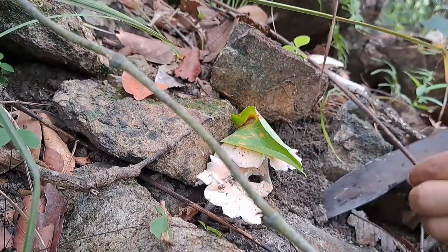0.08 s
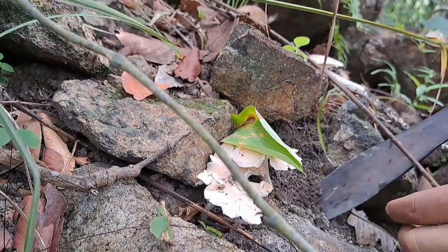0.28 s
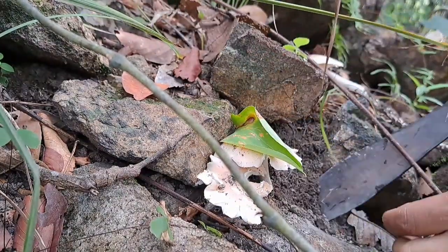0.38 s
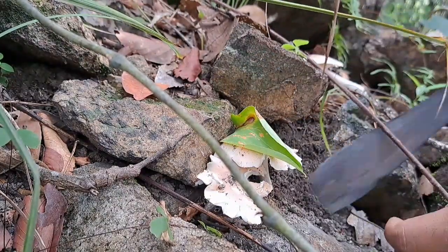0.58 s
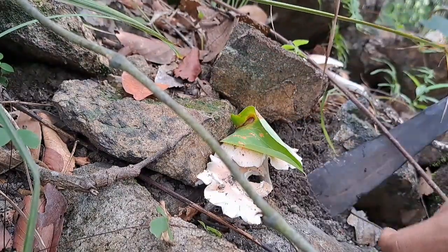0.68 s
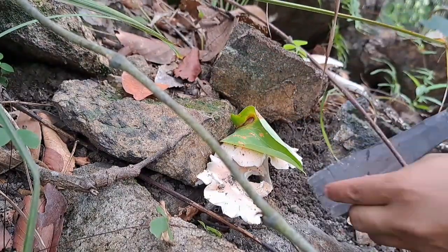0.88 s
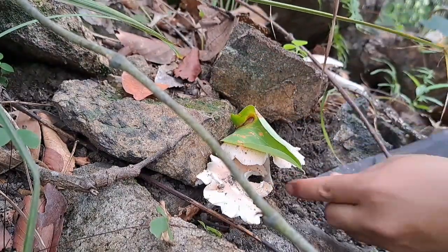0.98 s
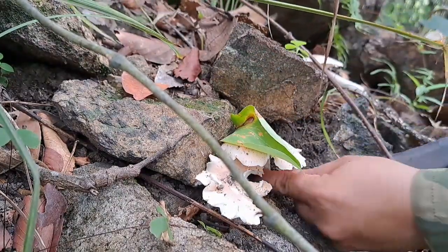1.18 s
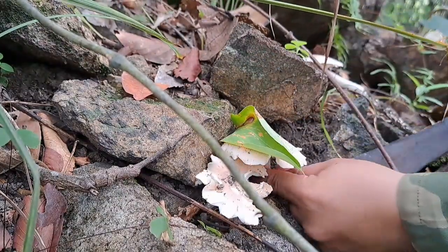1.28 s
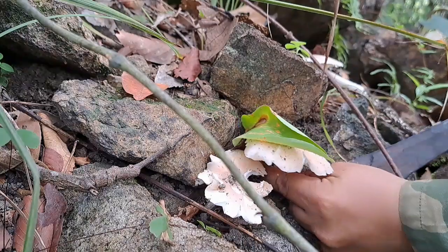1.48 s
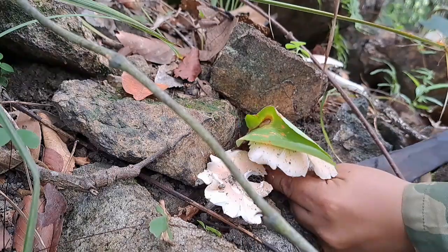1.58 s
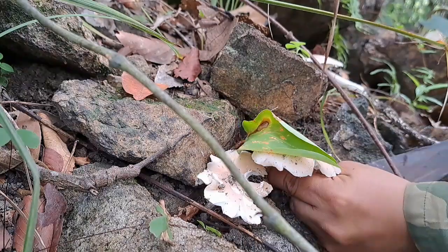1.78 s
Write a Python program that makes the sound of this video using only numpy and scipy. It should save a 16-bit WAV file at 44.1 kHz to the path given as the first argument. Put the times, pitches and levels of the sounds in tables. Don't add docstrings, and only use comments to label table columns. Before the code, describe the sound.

A broad knife scrapes and chops gritty, stony soil, then a hand rustles leaves and snaps stalks

```python
import sys
import numpy as np
from scipy import signal
from scipy.fft import rfft, irfft, next_fast_len
from scipy.io import wavfile
from scipy.ndimage import uniform_filter1d

SR = 44100
rng = np.random.default_rng(int(sys.argv[2]) if len(sys.argv) > 2 else 0)


def unload_wav(signal):
    wavfile.write(
        sys.argv[1],
        SR,
        np.round(np.clip(np.atleast_2d(signal).T, -1, 1) * 32767).astype(np.int16),
    )


def voltage_ratio(decibels):
    exponent = np.asarray(decibels, float) / 20
    return 10 ** exponent


N = 81585
T = np.arange(N) / SR
M = next_fast_len(N + 8192)
F = np.arange(M // 2 + 1) * SR / M + 1
THIN = 1 / (1 + (350 / F) ** 4)


def unit(x):
    return x / np.sqrt(np.mean(x ** 2))


def on_log(table, col=1):
    a = np.array(table, float)
    return np.interp(np.log(F), np.log(a[:, 0]), a[:, col])


def shape(x, gain):
    return irfft(rfft(x, M) * gain, M)[..., :N]


def colour(table):
    g = voltage_ratio(on_log(table))
    return g / np.sqrt(np.mean(g ** 2))


def resonance(hz, width_hz):
    return 1j * F * width_hz / (hz ** 2 - F ** 2 + 1j * F * width_hz)


def tail(t60):
    n = np.arange(4096)
    h = rng.standard_normal(4096) * voltage_ratio(-60 * n / SR / t60)
    return rfft(h / np.sqrt(np.sum(h ** 2)), M)


def twin(x):
    return np.array([x, x * rng.choice([-1., 1.], N)])


def wander(hold):
    return np.repeat(rng.standard_normal(N // hold + 1), hold)


def crush(coarse_db):
    strength = voltage_ratio(coarse_db * wander(20)[:N])
    return unit(twin(strength * rng.standard_normal(N)))


def grains(per_s, spread_db, flicker_hz, flicker_db):
    k = int(SR / flicker_hz)
    flicker = voltage_ratio(flicker_db * uniform_filter1d(wander(k), k)[:N])
    out = 0
    for hz in 700. * 2 ** (np.arange(16) / 3.3):
        patch = voltage_ratio(2.1 * uniform_filter1d(wander(900), 600)[:N])
        hit = rng.random(N) < per_s / SR
        size = voltage_ratio(np.minimum(rng.exponential(size=N), 5) * spread_db) * rng.standard_normal(N)
        clicks = twin(hit * size * patch * flicker)
        out = out + shape(clicks, np.sqrt(hz) * resonance(hz, 0.27 * hz) ** 2)
    return unit(out)


def effort(tables):
    s, level_db, thud_db = np.vstack(tables).T
    return voltage_ratio(np.interp(T, s, level_db, -150, -150)), voltage_ratio(np.interp(T, s, thud_db))


def burst(s, db, t60, attack):
    t = T - s
    swell = np.clip(t / max(attack, .0003) + .5, 0, 1) ** 2
    return swell * voltage_ratio(db - 60 * np.clip(t - attack / 2, 0, 1) / np.clip(t60, .004, .034))


# pitch_hz [Hz], width_hz [Hz], level_db [dB]
SOIL = [(60.6, 15.5, 0.5), (135.8, 18, 3), (233.6, 56, 1), (314, 81, 3.5), (685, 1360, -4)]


def soil(x, cut_hz):
    g = 0
    for k, (hz, width_hz, db) in enumerate(SOIL):
        g = g + (-1) ** k * voltage_ratio(db) * resonance(hz, width_hz)
    g = g / np.sqrt(np.mean(abs(g) ** 2))
    return shape(x, g / (1 + (cut_hz / F) ** 2))


# pitch_hz [Hz], level_db [dB]
FOREST = [(24, -32), (40, 14), (1290, -12.5), (1660, -3.5), (4640, -3), (15800, -8)]
FOREST_DB = -58


def forest():
    mid, side = (shape(rng.standard_normal(N), colour(FOREST)) for _ in range(2))
    side = shape(side, np.clip(F / 1200, .25, 1))
    return voltage_ratio(FOREST_DB - 9) * np.array([mid + side, mid - side])


# start_s [s], peak_db [dB], pitch_hz [Hz], t60_s [s]
THUDS = [
    (0.304, -8.5, 430, 0.0089),
    (0.324, -23.5, 460, 0.026),
    (0.6252, -17, 520, 0.0087),
    (0.639, -16, 347, 0.01),
    (0.678, -31, 140.5, 0.07),
    (0.701, -41, 65.3, 0.09),
    (1.4033, -32.5, 155, 0.068),
    (1.417, -40.5, 115, 0.08),
    (1.44, -48, 180, 0.083),
]
THUD_ROUGH = 0.22


def thuds():
    rumble = unit(shape(rng.standard_normal(N), resonance(190, 210) ** 2))
    out = 0
    for s, db, hz, t60 in THUDS:
        t = T - s
        fall = voltage_ratio(db - 60 * np.clip(t, 0, 1) / np.clip(t60, .005, .1))
        rise = np.clip(t * hz * 2, 0, 1)
        rough = THUD_ROUGH * (130 / hz) ** 2 * rumble
        out = out + fall * rise * (np.sin(2 * np.pi * hz * t) + rough)
    return out


# start_s [s], length_s [s], pitch_hz [Hz], level_db [dB]
RUBS = [(1.511, 0.033, 4000, -49), (1.506, 0.11, 4530, -46.5), (1.53, .012, 3000, -43),
        (1.555, .028, 440, -51), (1.556, 0.019, 1650, -44.5), (1.633, 0.023, 4350, -45),
        (1.635, .055, 6180, -60), (1.651, 0.027, 3530, -61), (1.684, 0.032, 2820, -59),
        (1.725, 0.04, 2890, -61), (1.7, 0.16, 4300, -64.5), (1.825, 0.019, 7160, -55.5),
        (1.826, 0.013, 8600, -59)]
RUB_WIDTH, RUB_FADE_S = 0.017, 0.0032


def rubs():
    noise, out = crush(1.2), 0
    for s, length, hz, db in RUBS:
        width = max(RUB_WIDTH * hz, 60)
        env = np.clip(np.minimum(T - s, s + length - T) / RUB_FADE_S + .5, 0, 1)
        mode = resonance(hz, width) * np.sqrt(SR / np.pi / width)
        out = out + shape(voltage_ratio(db) * env * noise, mode)
    return out


# start_s [s], rustle level_db [dB], soil thud_db [dB re rustle]
MOVES = [
    [(.745, -47, -10), (.76, -38.5, -12), (.86, -37, -4), (.87, -48, -16.5), (.92, -54.5, 2.5)],
    [(.95, -39.5, -17), (.96, -37, -5.5), (1.04, -40.5, -3.5), (1.13, -44, -4.5), (1.165, -52, -6),
     (1.19, -64, 2)],
    [(1.22, -39, -12), (1.3, -46, -11.5), (1.35, -68, -14), (1.4, -34.5, -23.5), (1.415, -56, -4),
     (1.48, -63, -36)],
    [(1.512, -52.5, -19), (1.54, -36.5, -21), (1.603, -37, -16.5), (1.628, -53.5, -7),
     (1.652, -43.5, -16.5), (1.7, -57.5, -7.5), (1.85, -58, -14)],
]
# start_s [s], peak_db [dB], pitch_hz [Hz], burst t60_s [s], attack_s [s]
SNAPS = [(0.73, -18.5, 8000, 0.016, 0.0013), (0.757, -32.5, 4000, 0.025, 0.001),
         (0.771, -27, 5370, 0.023, 0.0017), (0.804, -27, 1600, 0.026, 0.004),
         (0.8798, -26, 5200, 0.014, 0.00045), (0.9543, -26.5, 1830, 0.024, 0.0023),
         (0.9698, -25, 1930, 0.037, 0.0012), (0.9884, -21, 2070, 0.04, 0.0033),
         (1.0077, -7, 8670, 0.022, 0.0013), (1.034, -23.5, 2030, 0.012, 0.002),
         (1.059, -28, 3550, 0.019, 0.0034), (1.084, -31, 5000, 0.013, 0.0023),
         (1.11, -29, 5150, 0.01, 0.0012), (1.2242, -29.5, 5500, 0.023, 0.0035),
         (1.237, -36, 5200, 0.014, 0.002), (1.4046, -18, 7460, 0.018, 0.0035),
         (1.5345, -22.5, 7900, 0.033, 0.003), (1.5389, -18.5, 2980, 0.019, 0.0011),
         (1.5613, -17.5, 4540, 0.017, 0.008), (1.5866, -25.5, 4560, 0.017, 0.003),
         (1.598, -20, 4600, 0.016, 0.00074), (1.613, -33, 4000, 0.015, 0.001),
         (1.621, -35, 4500, 0.012, 0.001), (1.6349, -25.5, 4370, 0.01, 0.0013),
         (1.7231, -37, 5500, 0.02, 0.0019)]
# pitch_hz [Hz], level_db [dB per Hz]
LEAF = [(350, -7.5), (600, -8.5), (2980, 0.5), (3320, -3), (4550, 3.5), (6950, -4.5), (15800, -10.5)]
RUSTLE_PER_S, RUSTLE_SPREAD_DB = 1400, 1


def hand():
    gain, thud = effort(MOVES)
    rustle = gain * grains(RUSTLE_PER_S, RUSTLE_SPREAD_DB, flicker_hz=89.92, flicker_db=3)
    low = thud * twin(twin(rustle[0])[1])
    noise, top = crush(1.13), rustle
    for s, db, hz, t60, attack in SNAPS:
        snap = noise * burst(s, db, t60, attack)
        top = top + shape(snap, 0.44 + 1.04 * resonance(hz, 0.12 * hz))
    return shape(top, colour(LEAF) * THIN) + soil(low, cut_hz=27)


# pitch_hz [Hz], level_db [dB], t60_s [s]
BLADE = [(1033, -5.5, .05), (1631, -17, .03), (2055, -15, .03), (2896, -3, .055), (3854, -12, .07),
         (4280, -6, .025), (4500, -9, .03), (4975, 0, .022), (5370, -6, .03), (6165, -12, .03),
         (7250, -13, .04), (9740, -14, .05), (11540, -11, .03), (13400, -11, .28)]


def blade_modes():
    modes = 0
    for hz, db, t60 in BLADE:
        decay = np.log(1000) / t60
        modes = modes + voltage_ratio(db) * resonance(hz, decay / np.pi) / np.sqrt(decay / SR)
    return modes


# start_s [s], end_s [s]
BURIED = [
    (.115, .2),
    (.358, .4),
    (.49, .52),
    (.686, 2),
]
BURIED_T60_S = .04


def soil_grip():
    return voltage_ratio(sum(-60 * np.clip(T - a, 0, 1) / BURIED_T60_S * (T < b) for a, b in BURIED))


# start_s [s], grit level_db [dB], soil thud_db [dB re grit]
STROKES = [
    [(0, -42.5, -27), (.01, -33.5, -9), (.06, -41.5, 2), (.105, -40, 5), (.12, -65, -4), (.18, -48.5, -13)],
    [(.215, -34.5, -10), (.25, -34.5, -9.5), (.297, -46, 2.5), (.304, -29, 7.5), (.35, -28, -3),
     (.37, -33, -6.5), (.39, -45.5, -1)],
    [(.47, -40, -2.5), (.515, -44, -18.5), (.55, -39, -13), (.605, -36.5, -25.5)],
    [(.625, -23, 0.5), (.652, -19, -13.5), (.658, -25, -10.5), (.687, -25.5, -4), (.693, -40.5, -27),
     (.72, -36.5, -4)],
]
# start_s [s], peak_db [dB], ring_db [dB], burst t60_s [s], attack_s [s]
STRIKES = [(0.0371, -22.5, -10, 0.031, 0.0058), (0.081, -23, -8, 0.066, 0.0029),
           (0.1031, -21.5, -25, 0.011, 0.001), (0.164, -47, -6, 0.02, 0.0018),
           (0.1866, -40, -17, 0.02, 0.001), (0.205, -38, -6, 0.03, 0.002),
           (0.2225, -17, -12.5, 0.039, 0.0017), (0.2613, -26.5, -1, 0.04, 0.0027),
           (0.3018, -10.5, -29, 0.04, 0.001), (0.309, -20, -16, 0.026, 0.0025),
           (0.3135, -9, -13.5, 0.044, 0.0033), (0.3332, -17, -31, 0.03, 0.0028),
           (0.341, -11, -21, 0.017, 0.001), (0.346, -24, -27, 0.024, 0.002),
           (0.4015, -29.5, -15, 0.013, 0.0006), (0.417, -34, -21, 0.024, 0.0025),
           (0.4916, -44, -18, 0.018, 0.002), (0.4447, -20, -10.5, 0.021, 0.0011),
           (0.4563, -25.5, -29, 0.0073, 0.00058), (0.521, -17, -10.5, 0.041, 0.0035),
           (0.527, -24.5, -6, 0.039, 0.00066), (0.5332, -20.5, -9, 0.039, 0.001),
           (0.5513, -19.5, -7.5, 0.041, 0.0018), (0.5569, -11, -2.5, 0.03, 0.00074),
           (0.561, -13, -6, 0.014, 0.00094), (0.6072, -29, -17, 0.033, 0.001),
           (0.613, -24, -15, 0.033, 0.002), (0.6242, -10.5, -7.5, 0.022, 0.0065),
           (0.63, -10, -27.5, 0.011, 0.00045), (0.6365, -11.5, -32, 0.034, 0.0057),
           (0.641, -17.5, -3.5, 0.0083, 0.0016), (0.647, -16.5, -22, 0.026, 0.002),
           (0.65, -27, -18, 0.01, 0.0009), (0.667, -22, -15, 0.027, 0.0041),
           (0.676, -34, -14, 0.018, 0.0037), (0.685, -41, -18, 0.016, 0.0024),
           (0.7004, -38, -12, 0.014, 0.0023)]
# pitch_hz [Hz], level_db [dB per Hz]
STONE = [(350, -66), (600, -9), (1310, -18.5), (1700, 4.5), (2140, -8), (4420, -0.5), (15800, -17)]
GRIT_PER_S, GRIT_SPREAD_DB, SCRAPE_RING_DB = 1200, 2.5, -15


def knife():
    gain, thud = effort(STROKES)
    grit = gain * grains(GRIT_PER_S, GRIT_SPREAD_DB, flicker_hz=159.9, flicker_db=3)
    noise = crush(2.1)
    hit_env = chatter_env = blows = 0
    for s, db, ring_db, t60, attack in STRIKES:
        hit_env = hit_env + burst(s, db, t60, attack) / (1 + 3 * voltage_ratio(ring_db))
        chatter_env = chatter_env + burst(s, db + ring_db - 3.5, t60, attack)
        blow_at = int((s + .001) * SR)
        blows = blows + voltage_ratio(db + 2 * ring_db + 21) * (np.arange(N) == blow_at)
    modes = blade_modes()
    light = modes / (1 + (1600 / F) ** 4)
    scrape = shape(voltage_ratio(SCRAPE_RING_DB) * grit + noise * chatter_env, light)
    ring = soil_grip() * (scrape + shape(blows, modes))
    stone = shape(grit + noise * hit_env, colour(STONE) * THIN)
    low = thud * twin(twin(grit[0])[1])
    return stone + ring + soil(low, cut_hz=87)


# pitch_hz [Hz], level_db [dB re right], likeness [0-1]
LEFT = [(97, 0.5, 0.99), (400, -3, 0.68), (1420, -4.5, 1), (2540, -6, 0), (5000, -10.5, 0.37),
        (6300, -8.5, 0), (7600, -6.5, 0.14), (15300, -3, 0.17)]
ECHO_DB, ECHO_T60_S = -14, .05


def ports(x, lag_s):
    like = np.clip(on_log(LEFT, col=2), 0, 1)
    delay = np.exp(-2j * np.pi * F * lag_s)
    path = voltage_ratio(on_log(LEFT)) * delay * (1 + voltage_ratio(ECHO_DB) * tail(ECHO_T60_S))
    left = shape(x[0], path * like) + shape(x[1], path * np.sqrt(1 - like ** 2))
    right = shape(x[0], 1 + voltage_ratio(ECHO_DB) * tail(ECHO_T60_S))
    return np.array([left, right])


def scene():
    near_hand = ports(hand() + rubs(), lag_s=3 / 44100)
    near_knife = ports(knife(), lag_s=13 / 44100)
    return forest() + thuds() + near_hand + near_knife


def low_pass(x):
    return signal.sosfilt(signal.butter(12, 17140, fs=SR, output="sos"), x)


# pitch_hz [Hz], width_hz [Hz], level_db [dB]
PORT = [(5100, 2200, 0), (7500, 440, 4.5), (7900, 275, 5.5), (6670, 910, -4), (13470, 770, 5)]
TOP_HZ = 15900


def record(dry):
    g = np.prod([1 + (voltage_ratio(db) - 1) * resonance(hz, w) for hz, w, db in PORT], axis=0)
    g = g / (1 + (F / TOP_HZ) ** 160) / (1 + (40 / F) ** 4)
    mix = np.tanh(shape(dry, g))
    return low_pass(mix)


dry = scene()
out = record(dry)
unload_wav(out)
```